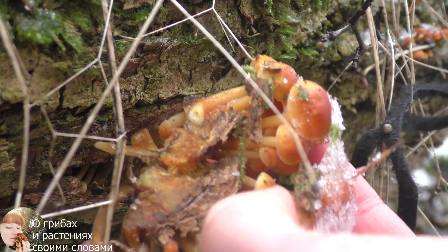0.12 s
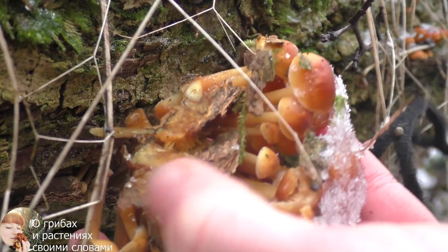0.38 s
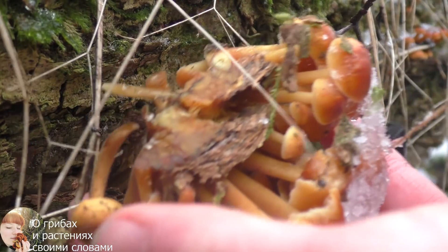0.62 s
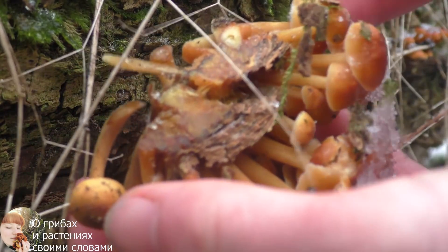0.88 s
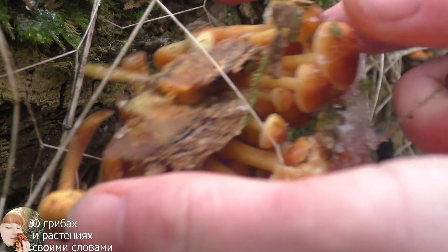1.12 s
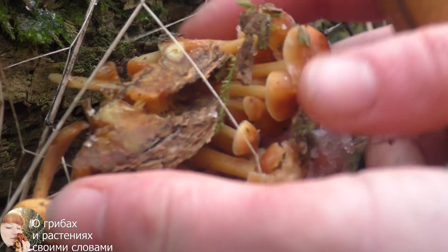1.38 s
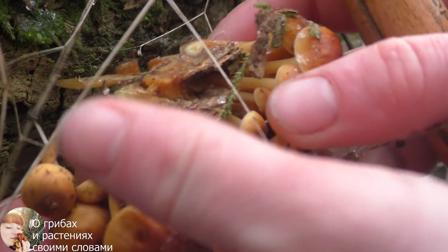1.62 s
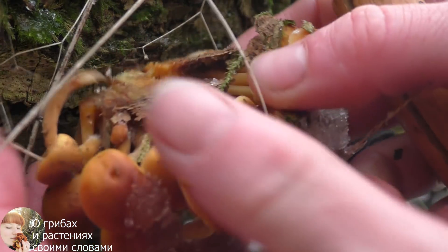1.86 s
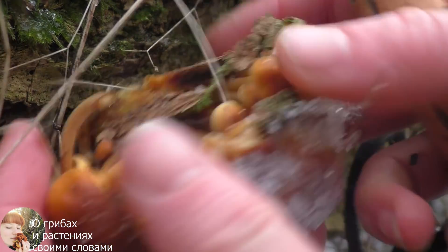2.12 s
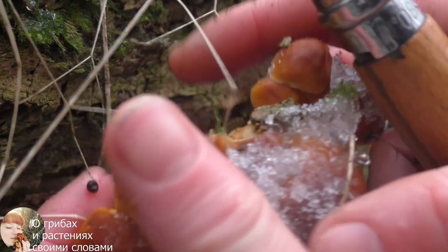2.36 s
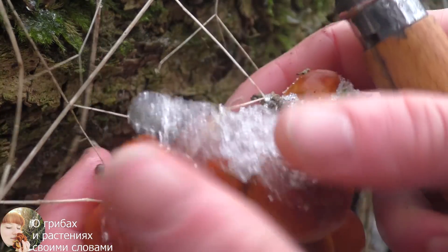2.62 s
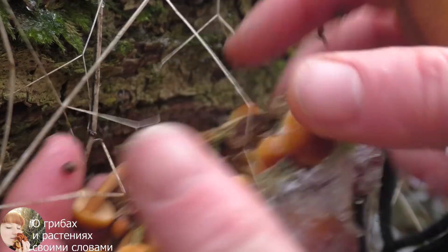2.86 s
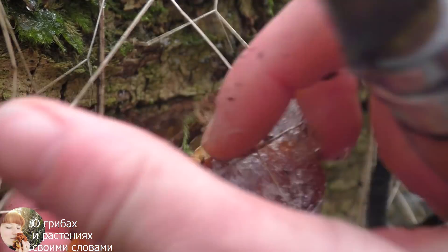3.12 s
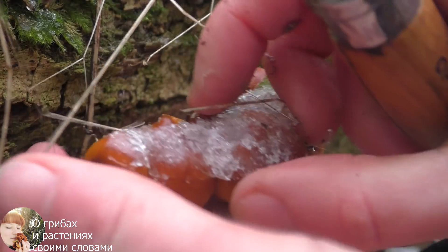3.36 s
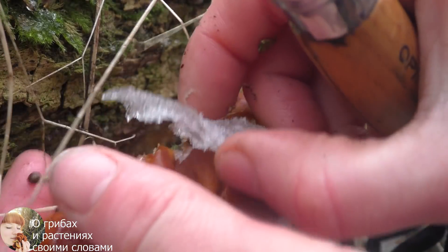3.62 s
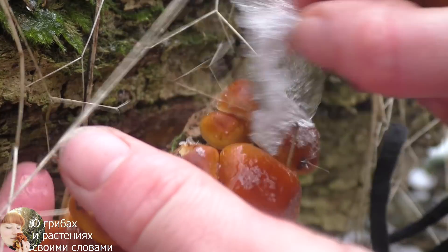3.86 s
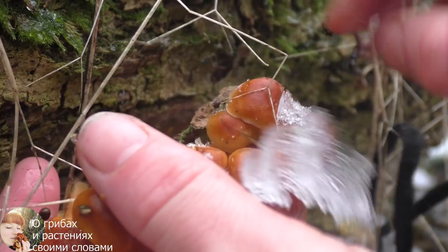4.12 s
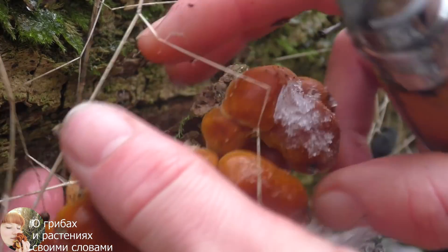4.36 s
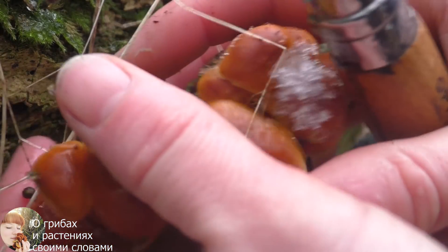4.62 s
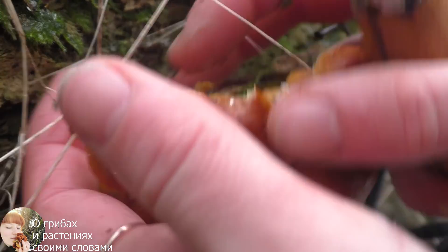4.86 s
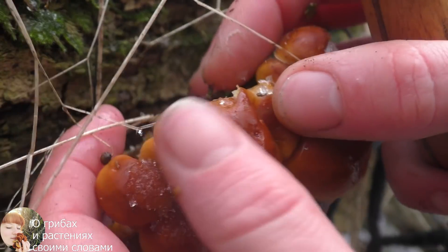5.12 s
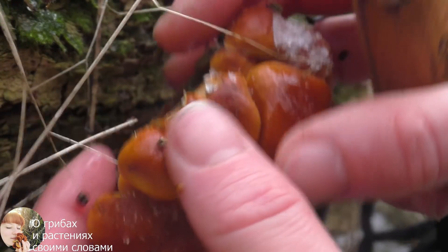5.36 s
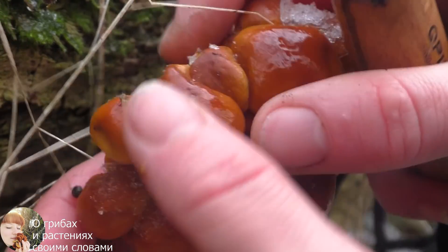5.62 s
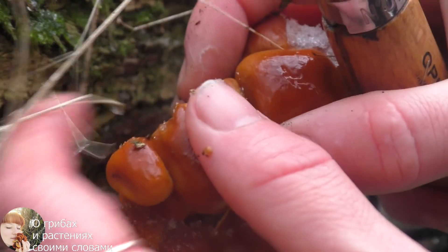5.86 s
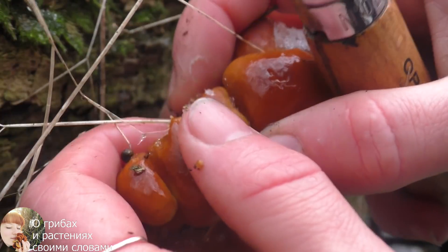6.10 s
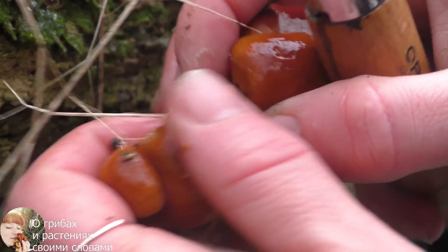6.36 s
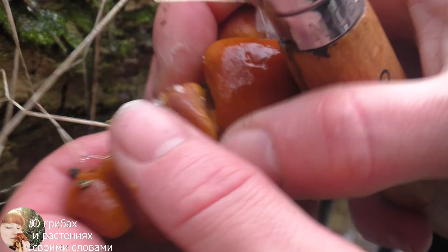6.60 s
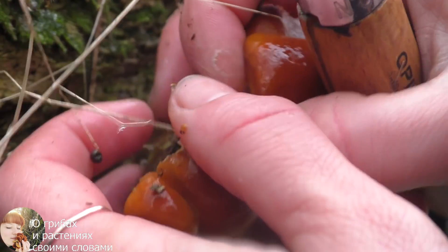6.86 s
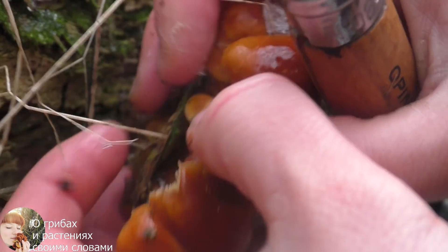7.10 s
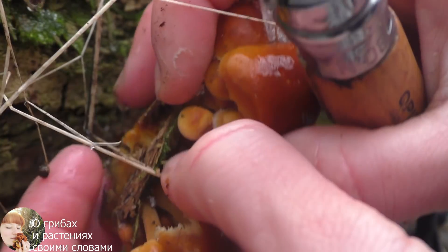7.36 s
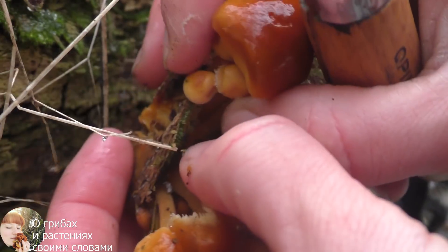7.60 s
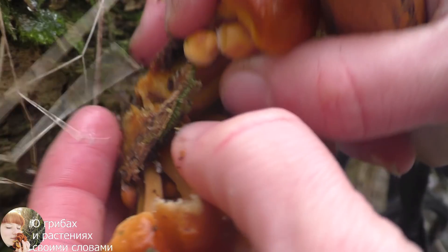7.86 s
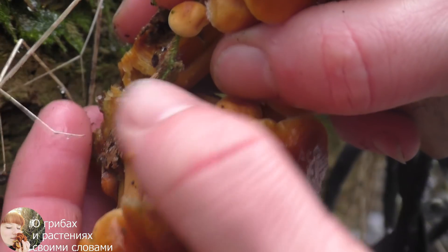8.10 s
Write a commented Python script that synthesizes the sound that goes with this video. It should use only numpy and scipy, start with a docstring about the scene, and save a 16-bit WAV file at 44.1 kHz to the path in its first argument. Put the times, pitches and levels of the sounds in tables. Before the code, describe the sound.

A near microphone catches hands pulling at icy mushrooms among dry grass. Irregular clicks, snaps and soft thuds scatter over granular rustle, busier in clumps. Hollow stalks give brief whistling scrapes, and grass brushes past lightly. The loudest bright crack comes a little before halfway, followed by more picking; later a tight cluster of snaps and knocks tears a piece loose. The open air is faint, without noticeable echo.

```python
"""Hands turn and pick apart a frosty clump of mushrooms on bark, close by in a quiet wood.
A steady hiss and rumble (shaped noise) lies under a rustle of random clicks that swells with the handling.
From the start dull knocks (damped modes) and brittle snaps (a ringing piece in a burst of noise) stand out;
soon hollow stalks whistle as they are scraped (slips exciting air resonances). Then come brushes through
dry grass (swells of the rustle) and, later, brief scuffs of a stalk (scrapes of one swell)."""
import sys
import numpy as np
from scipy import signal
from scipy.fft import rfft, irfft
from scipy.io import wavfile
from scipy.ndimage import uniform_filter1d

SR = 44100
rng = np.random.default_rng(int(sys.argv[2]) if len(sys.argv) > 2 else 0)


def master(y):
    """Save y as 16-bit WAV."""
    cut = np.clip(np.atleast_2d(y).T, -1, 1)
    pcm = np.round(cut * 32767)  # scale
    wavfile.write(sys.argv[1], SR, pcm.astype(np.int16))


def how_loud(loudness_db):
    """Turn decibels into a plain amplitude multiplier (0 dB gives 1, 20 dB gives 10)."""
    steps = np.asarray(loudness_db, float) / 20
    return 10 ** steps


N = 362943  # length [samples]

# The clearest brittle breaks: (time [s], ring peak [dB], ring frequency [Hz], dull crack peak [dB],
# bright crack peak [dB], decay time T60 [s], before limits and the ring's added decay)
BREAKS = [(0.0433, -31, 2320, -35, -29.5, 0.0047), (.128, -45, 4380, -30, -39, 0.03),
          (0.371, -38, 2470, -40, -56, 0.012), (0.392, -43, 6850, -47, -38, .02),
          (0.6506, -36, 1610, -35, -46, 0.013), (0.6842, -25, 13650, -50, -14, 0.0051),
          (.6971, -29, 6650, -48, -41, .0034), (0.7221, -28, 4620, -24, -38, 0.0098),
          (.7523, -41, 1610, -47, -38, 0.011), (.7902, -33.5, 2370, -37, -58, .01),
          (.812, -35, 9150, -42, -34, .0035), (0.885, -31, 2800, -41, -56, 0.0068),
          (.891, -33, 2070, -36, -58, 0.011), (.9016, -33, 4890, -38, -47, 0.0055),
          (0.923, -47, 4700, -36.5, -29, 0.0068), (1.0008, -38, 2260, -37, -50, .004),
          (1.0311, -16.5, 7900, -43, -18, 0.0014), (1.0371, -30, 13700, -42, -21, .0034),
          (1.2177, -36, 2500, -36, -53, 0.0068), (1.458, -27, 3900, -27.5, -43, 0.0019),
          (1.5767, -30.5, 9360, -47, -31, 0.0061), (1.8974, -20, 6300, -25.5, -44, 0.0033),
          (1.9079, -25, 6500, -29.5, -31, 0.014), (2.002, -34.5, 2240, -42, -65, .013),
          (2.022, -30, 3380, -37, -60, 0.0076), (2.034, -33, 3400, -37, -50, 0.006),
          (2.3223, -37, 5700, -46, -37, .004), (2.4155, -25, 4030, -47, -54, 0.013),
          (2.42, -31, 3650, -39, -28, .018), (2.485, -38, 2400, -31, -54, 0.0034),
          (2.507, -38, 3500, -36, -53, 0.0064), (2.5929, -30, 9150, -54, -27, 0.0039),
          (2.664, -29, 7700, -34.5, -35, 0.0039), (2.7052, -29.5, 1640, -38, -51, 0.0047),
          (2.729, -39, 2630, -42, -37, 0.0087), (2.7662, -29.5, 7700, -49, -30, .006),
          (2.792, -41, 4550, -42, -44, 0.0052), (2.7985, -34, 2370, -37, -51, 0.0094),
          (2.8052, -35.5, 1610, -41, -48, 0.0093), (2.809, -44, 7040, -42, -44, .023),
          (2.833, -42, 2220, -39, -48, 0.0082), (2.886, -32, 6800, -47, -35, 0.0023),
          (2.894, -44, 14880, -48, -34, .01), (3.183, -39, 7800, -37, -34, 0.0067),
          (3.1869, -26.5, 7440, -48, -34, 0.0029), (3.3501, -27, 2290, -49, -59, 0.0045),
          (3.4862, -35, 9000, -54, -32, .004), (3.5372, -21, 8000, -55, -18, 0.0033),
          (3.5684, -22, 5600, -39, -29, 0.0037), (3.578, -33, 1780, -32, -50, .005),
          (3.5947, -31, 5920, -29, -30, 0.0046), (3.6067, -1, 12270, -19, -6, 0.0022),
          (3.6065, -1, 5760, -35, -29, 0.0051), (3.6274, -37, 6500, -38, -39, .015),
          (3.6407, -40, 6120, -52, -41, .0034), (3.7417, -31, 7500, -51, -42, .003),
          (3.778, -36, 7740, -45, -25, .006), (3.799, -34, 7000, -52, -27, .015),
          (3.8128, -33, 11800, -60, -30, 0.004), (3.8562, -36, 7850, -42, -37, 0.031),
          (3.872, -31, 7700, -33, -42, .0035), (3.9338, -34, 5870, -50, -28, 0.015),
          (3.9454, -33, 1550, -38, -45, 0.018), (3.9514, -20, 8600, -44, -17, 0.0047),
          (3.959, -18.5, 9060, -26.5, -26, 0.0051), (3.9671, -21.5, 7660, -26, -43, .0055),
          (4.1383, -36.5, 2300, -43, -34, 0.012), (4.2957, -45, 2740, -37.5, -35, 0.039),
          (4.345, -19, 10000, -38, -18, 0.0046), (4.3574, -40, 2970, -30, -38.5, 0.026),
          (4.362, -18, 10500, -27.5, -28, 0.006), (4.4605, -34, 9150, -47, -24, .0036),
          (4.5052, -36, 2760, -43, -32, 0.0042), (4.5591, -30, 4360, -33, -25, 0.027),
          (4.5629, -12, 4250, -27, -16.5, 0.0025), (4.575, -33, 13540, -41, -33, .004),
          (4.6586, -37, 6180, -48, -34, .007), (4.715, -33, 5140, -38, -35, 0.0088),
          (4.7484, -46, 1650, -28, -56, 0.0081), (4.8018, -48, 4500, -33, -43, 0.025),
          (4.8785, -24, 4260, -36, -36, 0.053), (4.9153, -35, 7400, -55, -20.5, .0035),
          (5.2372, -27.5, 2360, -40, -35, 0.0068), (5.4463, -33.5, 1580, -31.5, -32, 0.0061),
          (5.68, -45, 3290, -38, -53, 0.012), (5.871, -41, 12100, -48, -47, .01),
          (6.0184, -37, 6050, -57, -47, 0.0033), (6.0698, -40, 6000, -35, -61, 0.022),
          (6.395, -36.5, 1700, -25, -45, 0.009), (6.6012, -32, 5600, -39, -51, 0.0034),
          (6.9517, -33, 1500, -35, -36, 0.0096), (6.9823, -40, 3160, -36, -33, .006),
          (6.9866, -30, 4350, -41, -34, .003), (7.012, -19, 6150, -27, -10, 0.01),
          (7.0169, -16, 13720, -19, -24, 0.0058), (7.0223, -16.5, 1850, -19, -14, 0.0075),
          (7.0272, -21, 5950, -21, -10, 0.012), (7.0329, -27, 7000, -20, -33, 0.013),
          (7.049, -30, 5860, -43, -32, 0.0046), (7.059, -23, 3130, -25, -16, 0.015),
          (7.11, -31.5, 4400, -26, -39, .031), (7.1232, -27, 1990, -38, -44, 0.013),
          (7.1285, -36, 2020, -41, -42, .03), (7.134, -24, 2160, -41, -46, 0.012),
          (7.1392, -21, 2180, -24.5, -40, 0.0087), (7.193, -31.5, 2330, -35.5, -45, .006),
          (7.24, -38, 4600, -28, -54, 0.021), (7.545, -33, 7500, -52, -31, 0.0022),
          (7.655, -39, 1650, -36, -42, 0.012), (7.6679, -31.5, 4330, -32, -54, 0.0043),
          (7.728, -37.5, 2970, -43, -43, .007), (7.889, -42, 5950, -40, -44, .003),
          (7.9286, -34, 2320, -28.5, -40, 0.0038), (7.9406, -33, 2410, -45, -57, 0.0038)]
# Work of the hands: (time [s], rustle level [dB], before brushes and crumbs are added)
HAND_WORK = [(0.0, -57.5), (0.34, -56.5), (0.53, -51), (0.68, -50.5), (0.98, -59), (1.12, -60),
             (2.38, -54.5), (2.63, -51), (2.98, -57), (3.32, -58.5), (3.6, -58), (3.8, -52.5),
             (3.94, -53.5), (4.1, -58), (4.31, -58), (4.7, -52.5), (4.86, -53), (4.97, -57.5), (5.16, -59),
             (5.98, -59.5), (6.26, -58), (6.81, -58), (7.06, -53), (8.23, -60)]


def evened(x):
    """Normalises the mean power: scales to rms 1."""
    return x / np.sqrt(np.mean(x ** 2) + 1e-20)


def peaked(x):
    """Normalises the greatest excursion: scales to peak 1."""
    return x / (abs(x).max(axis=-1, keepdims=True) + 1e-12)


def band(x, lo_hz, hi_hz):
    """Band-pass filtering by a Butterworth response."""
    return signal.sosfilt(signal.butter(2, [lo_hz, hi_hz], "band", fs=SR, output="sos"), x)


def colour(x, points):
    """Spectral shaping: weights each frequency by a curve of (frequency [Hz], gain [dB])."""
    f, db = np.transpose(points)
    hz = np.fft.rfftfreq(len(x), 1 / SR)
    gain = how_loud(np.interp(np.log(hz + 1), np.log(f + 1), db))
    return irfft(rfft(x) * gain, len(x))


def add(mix, s, sound):
    """Linear superposition: mixes a sound in at time s."""
    part = mix[max(round(s * SR), 0):][:len(sound)]
    part += sound[:len(part)]


def resonate(x, hz, width_hz):
    """Resonance by heterodyning: shifts the (moving) frequency hz to zero, smooths, and shifts back."""
    turn = np.exp(2j * np.pi * np.cumsum(hz * np.ones(len(x))) / SR)
    r = np.exp(-np.pi * width_hz / SR)
    smooth = signal.lfilter([1 - r], [1, -r], x / turn)
    return 2 * (turn * smooth).real


def grains(count, per_s, spread_db):
    """Random impulse train: sparse clicks of either sign, a few of them large."""
    hit, sign, size = rng.random((count, 3)).T
    size_db = spread_db * np.minimum(-np.log(size + 1e-9), 4)
    return (hit < per_s / SR) * np.sign(sign - .5) * how_loud(size_db)


def air():
    """Stationary noise: the steady faint hiss and low rumble of the open wood."""
    # Spectrum of the wood: (frequency [Hz], relative level per Hz [dB])
    air_spectrum = [(7.1, -19), (12, 8.5), (36, -3), (79, -8.5), (195, -13.5), (335, -12), (1690, -24.5),
                    (2430, -31), (3590, -29.5), (7590, -36), (13400, -47), (15600, -39)]
    return how_loud(-51.5) * evened(colour(rng.standard_normal(N), air_spectrum))


def handling_db():
    """Addition of powers: rustle level per sample from hand work, grass brushes and crumbs of each break."""
    # Short brushes through dry grass: (time [s], rustle level [dB], half length [s])
    brush_rows = [(1.27, -55, .03), (2.18, -49, .02), (5.446, -52.5, 0.048), (6.505, -53, 0.022),
                  (6.79, -54, .02), (7.36, -55, .04), (7.617, -53, .04), (7.92, -53, 0.027)]
    t = np.arange(0, N / SR, .002)
    break_s, ring_db = np.transpose(BREAKS)[:2, :, None]
    # Crumbs rustle around every break, more for a loud one
    crumbs_db = -60 + 0.15 * (ring_db - ring_db.mean())
    crumbs = (how_loud(2 * crumbs_db) * np.exp(-abs(t - break_s) / 0.01)).sum(0)
    brushes = sum(how_loud(2 * db) * np.exp(-((t - s) / half) ** 2) for s, db, half in brush_rows)
    work = how_loud(2 * np.interp(t, *np.transpose(HAND_WORK)))
    return np.interp(np.arange(N) / SR, t, 10 * np.log10(work + brushes + crumbs))


def rustle():
    """Granular noise: countless clicks of grass and frost, some ringing, come in clumps with the handling."""
    # Spectrum of the fine rustle: (frequency [Hz], relative level per Hz [dB])
    rustle_spectrum = [(1470, -24), (2500, 3.5), (3270, -0.5), (7770, 2.5), (8650, 0), (15600, -3),
                       (16300, -40)]
    fine_db = handling_db()
    low_db = -34.5 + 0.5 * fine_db  # the low rub of skin swells less than the treble
    clumps = how_loud(2.67 * evened(uniform_filter1d(rng.standard_normal(N), 260)))
    hiss = evened(grains(N, 5000, 4.6))
    t = np.arange(300) / SR
    ticks = np.zeros(N)
    for hz in np.geomspace(2200, 14000, num=14):
        ring = np.exp(-t * hz / 3.1) * np.cos(2 * np.pi * hz * t)
        ticks += signal.oaconvolve(grains(N, 12, 5.8), peaked(ring))[:N]
    clicks = (hiss + how_loud(-8.5) * evened(ticks)) * clumps
    fine = how_loud(fine_db) * evened(colour(clicks, rustle_spectrum))
    low = how_loud(low_db) * evened(band(grains(N, 1500, 4.1) * clumps, 410, 2360))
    return fine + low


def knocks():
    """Modal synthesis: a short push rings a few damped modes, roughened by scattered echoes."""
    # Dull knocks: (time [s], body peak [dB] before contact crackle and band-pass, reference pitch [Hz])
    knock_rows = [(0.043, -34, 770), (0.3, -28, 1030), (0.557, -30, 1190), (0.79, -36.5, 1290),
                  (1.039, -28.5, 1010), (1.26, -32, 1140), (1.467, -35, 1150), (1.775, -29, 1200),
                  (1.956, -31, 1010), (2.364, -31, 1310), (2.517, -32.5, 1210), (2.651, -32, 1170),
                  (3.259, -31.5, 1260), (3.347, -29, 1110), (3.605, -36, 543), (3.756, -28, 1170),
                  (3.946, -30.5, 1330), (4.004, -25.5, 1130), (4.033, -30.5, 1240), (4.725, -32, 1300),
                  (4.747, -28.5, 1450), (5.417, -31, 1210), (5.487, -29, 1150), (6.107, -30.5, 780),
                  (6.155, -30.5, 1270), (6.223, -28, 1070), (6.798, -29.5, 1070), (6.953, -27, 1160),
                  (7.012, -24, 660), (7.014, -26, 1560), (7.019, -39, 1560), (7.025, -33, 1560),
                  (7.032, -22.5, 540), (7.039, -39, 1210), (7.487, -30.5, 1180), (7.67, -24.5, 1140),
                  (7.727, -35.5, 480), (8.18, -32.5, 1200)]
    # Modes of the struck body: (multiple of pitch [ratio], relative level [dB], decay time T60 [s])
    mode_rows = [(.38, -8, 0.0052), (.62, 5, 0.0047), (.8, 1.5, 0.0071), (1, 3, 0.011), (1.15, 0.5, 0.0048),
                 (1.35, -3, 0.014), (1.7, 5.5, 0.0037), (2.25, -13, 0.004)]
    t, out = np.arange(3000) / SR, np.zeros(N)
    push = 1 - np.exp(-t / 0.0021)
    echoes = rng.standard_normal((len(knock_rows), 600)) * 0.037 * how_loud(-60 * t[:600] / 0.056)
    echoes[:, 0] = 1  # direct sound
    for (s, db, hz), echo in zip(knock_rows, echoes):
        modes = sum(how_loud(d - 60 * t / t60) * np.sin(2 * np.pi * k * hz * t) for k, d, t60 in mode_rows)
        body = peaked(signal.fftconvolve(modes * push, echo))
        body[:599] += how_loud(-4) * peaked(echo[1:])  # the contact itself crackles
        add(out, s, how_loud(db) * body)
    return band(out, 300, 7600)


def small_snaps(count=90):
    """Inhomogeneous random process: rows for faint breaks, likelier while the hands are busy."""
    when, size, pitch, tilt, ring = rng.random((count, 5)).T
    t = np.arange(0, N / SR, .01)
    busy = np.cumsum(how_loud(1.6 * np.interp(t, *np.transpose(HAND_WORK))))
    s = np.interp(when, busy / busy[-1], t)
    ring_db = -45 - 0.5 * np.log(size + .02)
    octaves = 3 * pitch  # the higher a piece rings, the brighter it cracks
    tilt_db = 12 * (tilt - .5)
    dull_db = ring_db - 0.5 - 4.5 * octaves - tilt_db
    bright_db = ring_db - 24 + 8 * octaves + tilt_db
    t60 = 0.0045 * 3 ** (2 * ring - 1)
    return np.transpose([s, ring_db, 1600 * 2 ** octaves, dull_db, bright_db, t60])


def snaps():
    """Brittle fracture: each break rings briefly at its own pitch inside a wide crack with a faint tail."""
    s, ring_db, hz, dull_db, bright_db, t60 = np.vstack([BREAKS, small_snaps()]).T[..., None]
    t, t60 = np.arange(1536) / SR, np.clip(t60, .001, .05)
    rise = 1 - np.exp(-t / .00008)
    grit = rng.standard_normal((len(s), len(t)))
    crack = rise * (how_loud(-60 * t / t60) + how_loud(-13 - 60 * t / 0.017)) * grit
    # The phase wanders, as the piece shifts while it rings
    wobble = 1.67 * np.cumsum(uniform_filter1d(grit, 12), axis=1) / np.sqrt(len(t) / 8)
    decay = how_loud(-60 * t / t60 - 60 * t / .08)
    ring = peaked(rise * decay * np.sin(2 * np.pi * hz * t + wobble))
    middle_db = (dull_db + bright_db) / 2 + 7.5  # the crack is smooth between its two ends
    sound = how_loud(ring_db) * ring
    sound += how_loud(dull_db - 8.0) * peaked(band(crack, 474, 1450))
    sound += how_loud(dull_db) * peaked(band(crack, 2090, 5420))
    sound += how_loud(middle_db) * peaked(band(crack, 3300, 10900))
    sound += how_loud(bright_db) * peaked(band(crack, 8900, 18400))
    # The one-sided push of air as the piece gives way
    sound += how_loud(ring_db - 29.5) * t / 0.00027 * np.exp(1 - t / 0.00027)
    out = np.zeros(N)
    for at, one in zip(s[:, 0], sound):
        add(out, at, one)
    return out


def scrape(rows, grit_db):
    """Stick-slip excitation: dense slips, in jerks, drive the two air resonances of a hollow stalk."""
    s, *columns = np.transpose(rows)
    t = np.arange(s[0], s[-1], 1 / SR)
    low_db, hz, high_db = (np.interp(t, s, c) for c in columns)
    # The finger sticks and jerks
    jerks = evened(resonate(rng.standard_normal(len(t)), 0, 1 / 0.0048))
    slips = grains(len(t), 2700, 2.6) * how_loud(2.5 * np.clip(jerks, -2, 2))
    low = evened(resonate(resonate(slips, hz, 240), hz, 600))
    # A hard scrape spreads the whistle
    wide_db = grit_db + 0.27 * (low_db + 34)
    wide = how_loud(wide_db) * evened(resonate(resonate(slips, hz, 1090), hz, 1300))
    high = evened(resonate(resonate(slips, 7360, 460), 7360, 1500))
    # The wall of the stalk rasps below its whistle
    body = how_loud(grit_db - 11.5) * evened(band(slips, 1200, 4300))
    sound = how_loud(low_db) * (evened(low + wide) + body) + how_loud(high_db) * high
    return s[0], sound * signal.windows.tukey(len(t), .1)


def stalk_scrapes():
    """Resonance of an air column: long scrapes whose whistle follows a path of level and pitch."""
    # One table a scrape: (time [s], low resonance level [dB], its frequency [Hz], high resonance level [dB])
    scrape_tables = [
        [(0.33, -63, 4370, -74), (0.342, -56, 4200, -64), (0.532, -50.5, 4260, -77), (0.548, -32.5, 4240, -59),
         (0.572, -47, 4230, -67), (0.586, -42, 4360, -64), (0.624, -49, 4440, -67), (0.636, -73, 4360, -82),
         (0.64, -74, 4380, -65)],
        [(2.51, -60, 3950, -57), (2.546, -45, 3960, -59), (2.574, -81, 4080, -73), (2.58, -70, 4100, -63),
         (2.632, -50, 3980, -64), (2.65, -62, 4060, -63), (2.67, -53, 4000, -52), (2.742, -83, 4400, -61),
         (2.8, -48, 4570, -65)],
        [(4.7, -60, 4620, -73), (4.714, -55, 4300, -61), (4.798, -45, 3900, -58), (4.844, -53, 4140, -65),
         (4.87, -41, 4060, -60), (4.882, -35, 4160, -43), (4.904, -42, 4080, -68), (4.914, -43, 4200, -52),
         (4.93, -56, 4180, -70)],
    ]
    # Grit of each scraped stalk, which spreads the whistle and lifts the rasp: (relative level [dB])
    grits = [-10, 1, 2.5]
    out = np.zeros(N)
    for rows, grit_db in zip(scrape_tables, grits):
        add(out, *scrape(rows, grit_db))
    return out


def scuffs():
    """Transient stick-slip: brief scuffs of a stalk, each a scrape of one swell at a fixed pitch."""
    # (peak time [s], low resonance level [dB], its frequency [Hz], rise time [s], fall time [s])
    scuff_rows = [(2.421, -46.5, 4000, .011, 0.052), (5.014, -43, 4040, 0.035, 0.022),
                  (6.93, -49, 4660, 0.065, 0.059)]
    out = np.zeros(N)
    for s, db, hz, rise, fall in scuff_rows:
        swell = [(s - rise, -28), (s, 0), (s + fall, -28)]  # (time [s], relative level [dB])
        rows = [(at, db + d, hz, db + d - 18) for at, d in swell]
        add(out, *scrape(rows, 4.5))
    return out


def scene():
    """Superposition of near sources: everything is close and dry, in the open."""
    mix = air() + rustle() + knocks() + snaps() + stalk_scrapes() + scuffs()
    return mix[None]


def top_cut(x):
    """Nothing passes above the cut-off."""
    return signal.sosfilt(signal.butter(12, 17150, fs=SR, output="sos"), x)


def record(dry):
    """Saturation and band limiting: the input stage bends the loudest snap softly, then a low-pass."""
    bent = .94 * np.tanh(dry / .94)
    low_pass = signal.firwin(127, 15900, window=("kaiser", 8), fs=SR)  # edge in Hz
    limited = signal.oaconvolve(bent, low_pass[None], "same")
    return top_cut(limited)


dry = scene()
out = record(dry)
master(out)
```